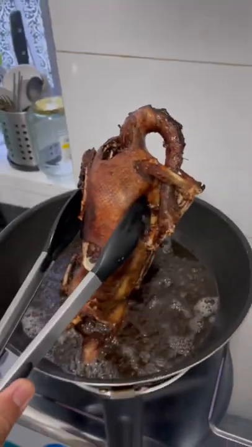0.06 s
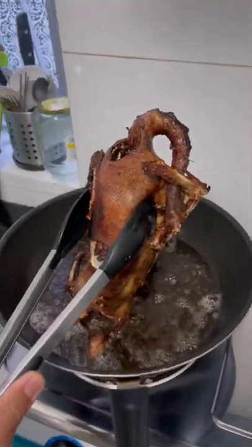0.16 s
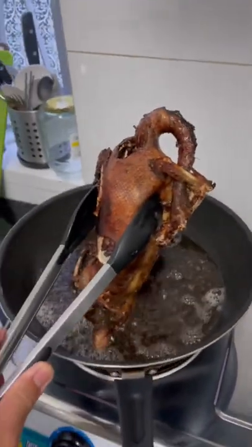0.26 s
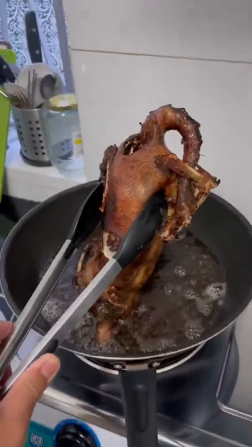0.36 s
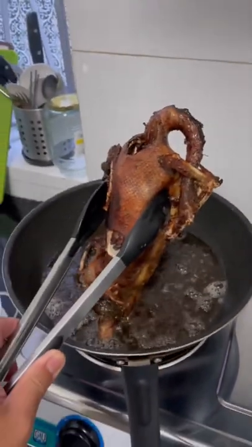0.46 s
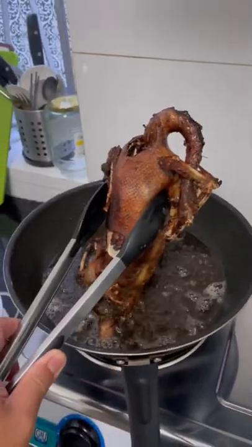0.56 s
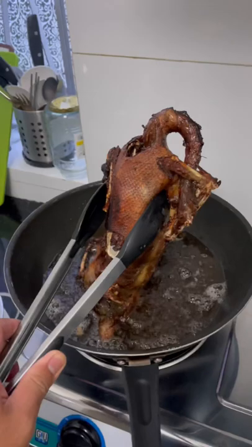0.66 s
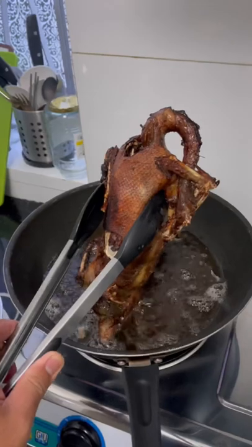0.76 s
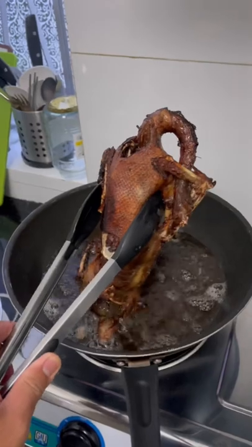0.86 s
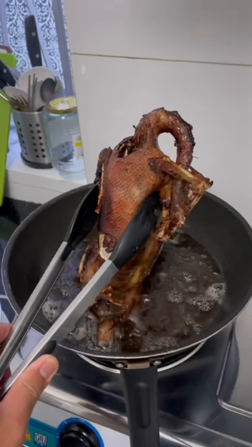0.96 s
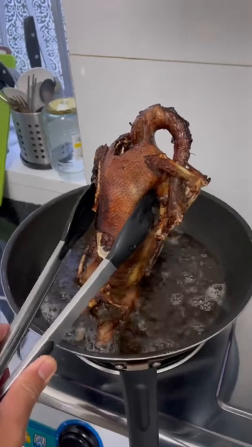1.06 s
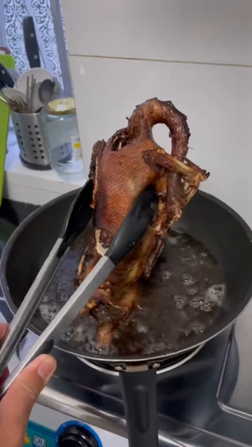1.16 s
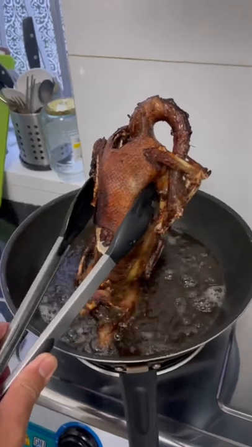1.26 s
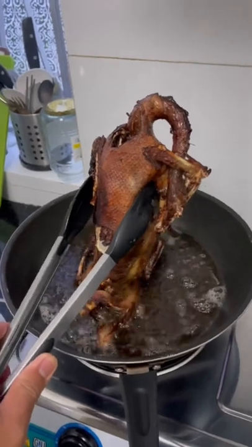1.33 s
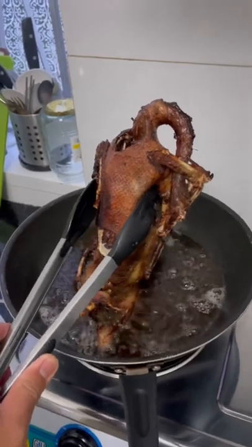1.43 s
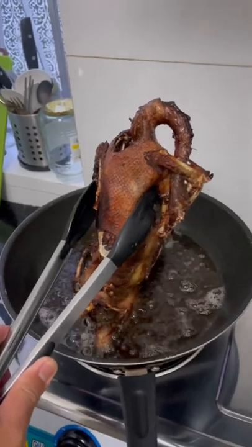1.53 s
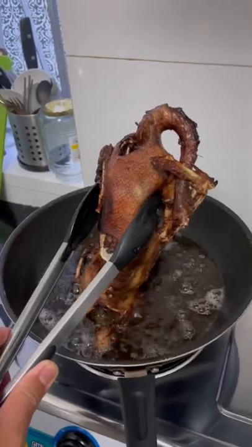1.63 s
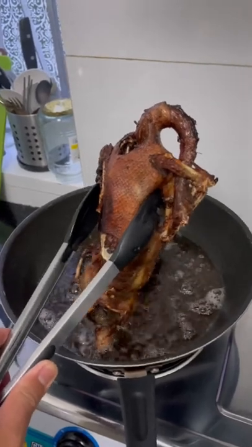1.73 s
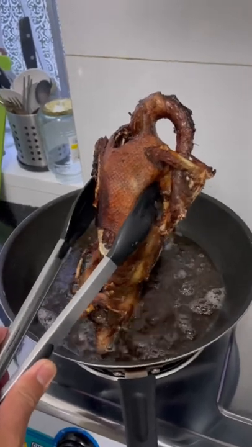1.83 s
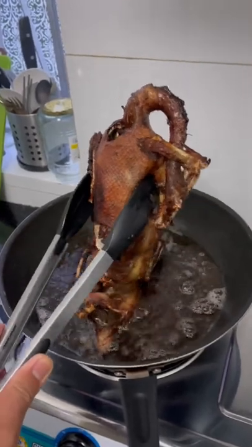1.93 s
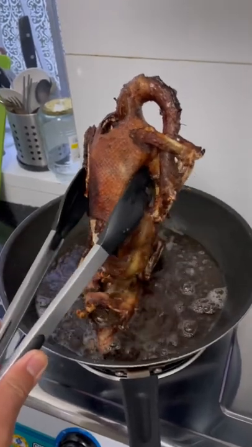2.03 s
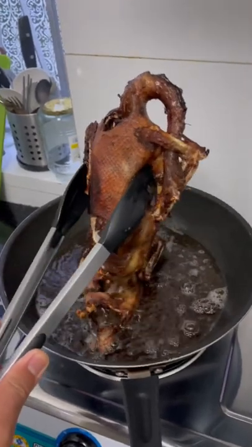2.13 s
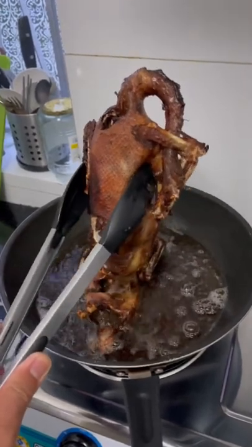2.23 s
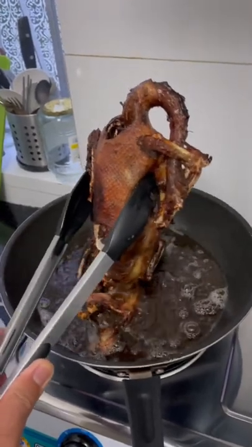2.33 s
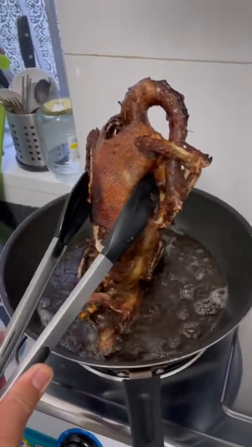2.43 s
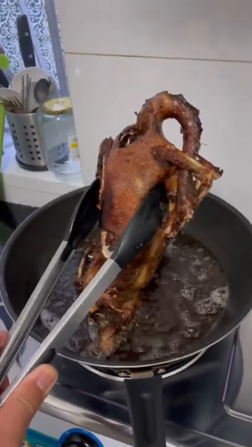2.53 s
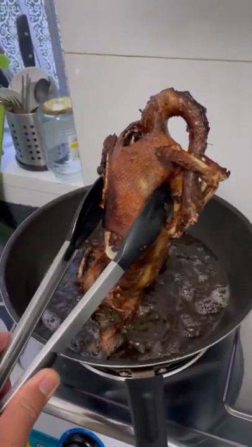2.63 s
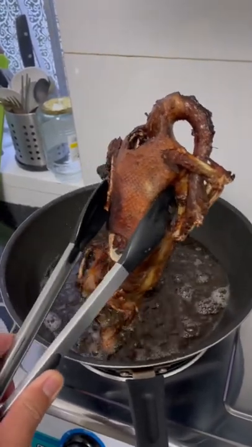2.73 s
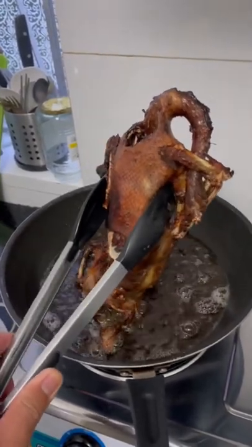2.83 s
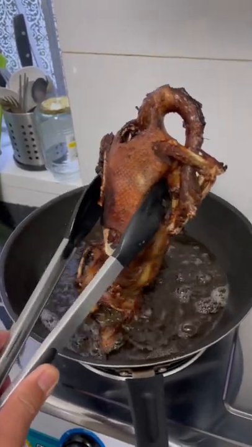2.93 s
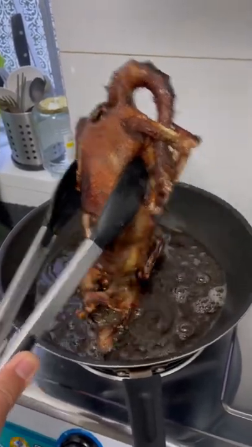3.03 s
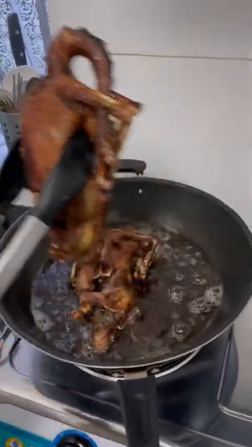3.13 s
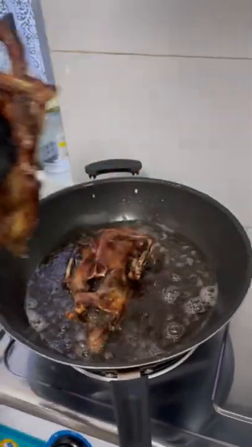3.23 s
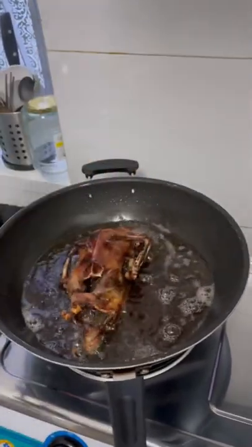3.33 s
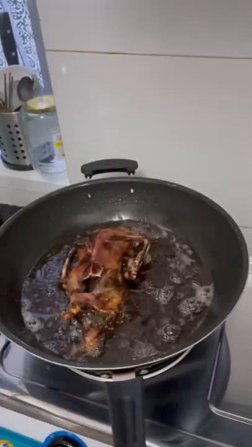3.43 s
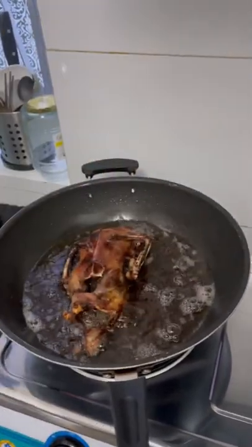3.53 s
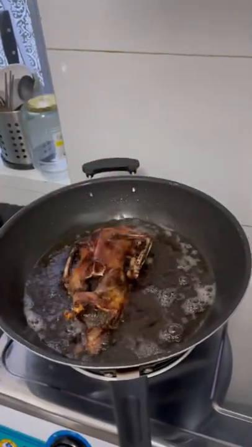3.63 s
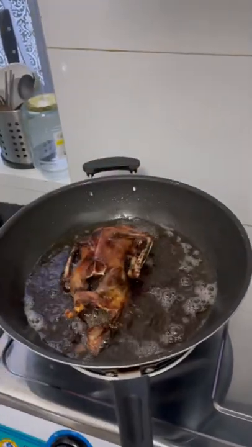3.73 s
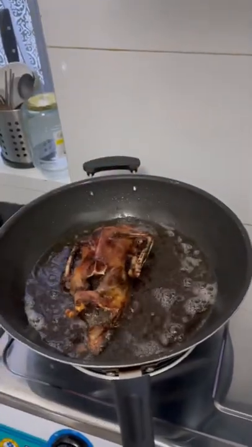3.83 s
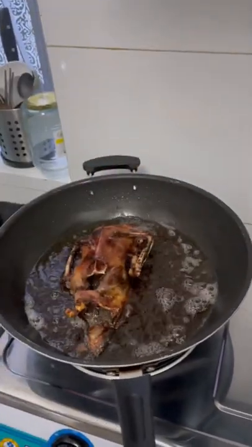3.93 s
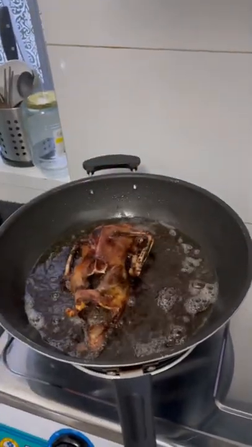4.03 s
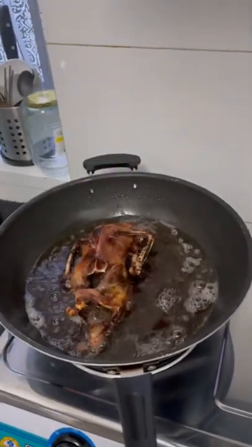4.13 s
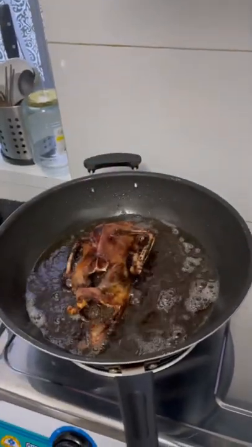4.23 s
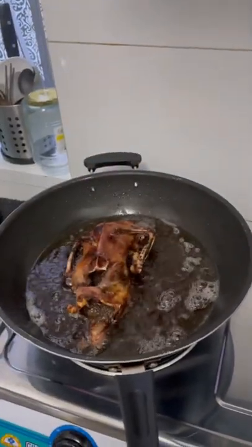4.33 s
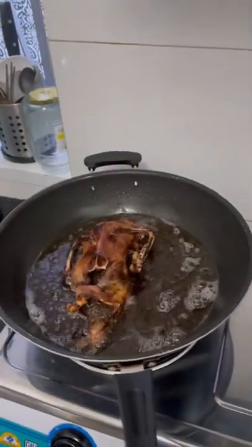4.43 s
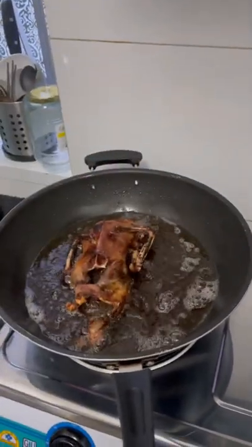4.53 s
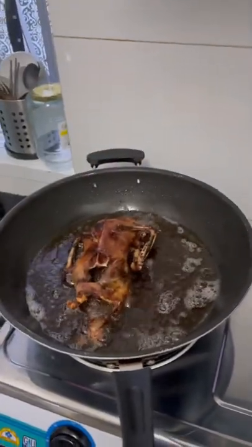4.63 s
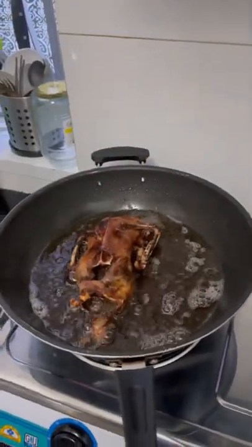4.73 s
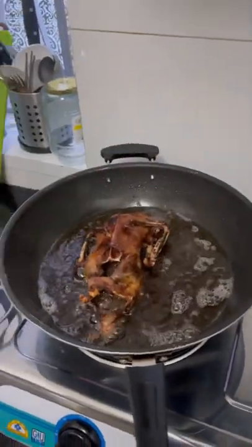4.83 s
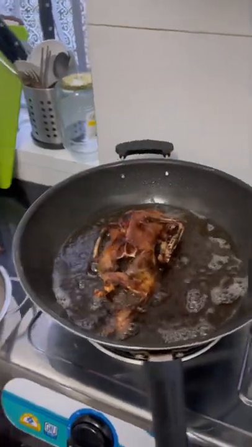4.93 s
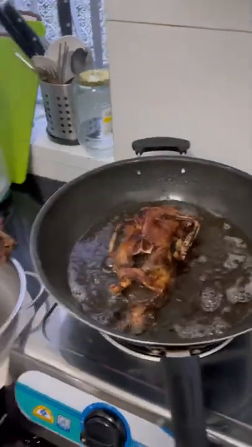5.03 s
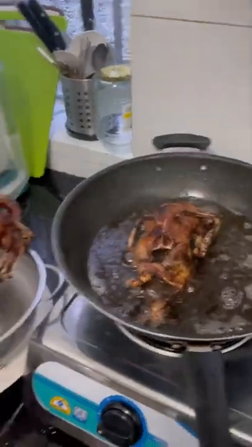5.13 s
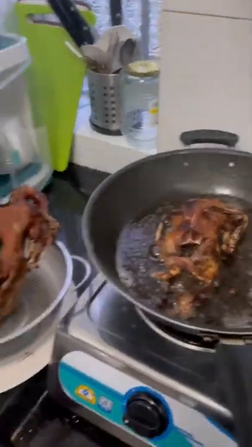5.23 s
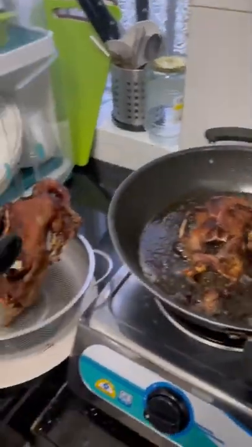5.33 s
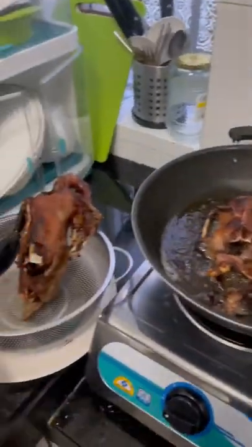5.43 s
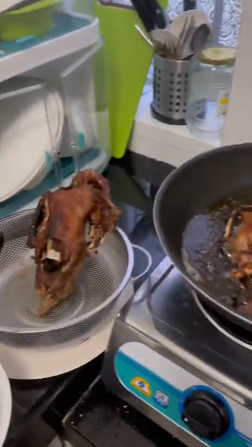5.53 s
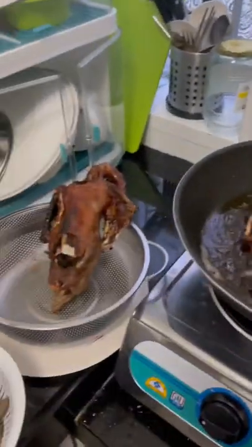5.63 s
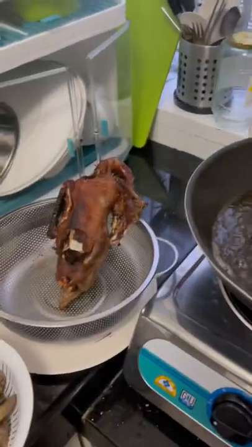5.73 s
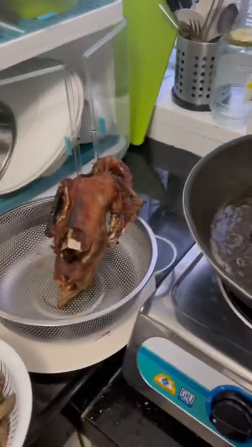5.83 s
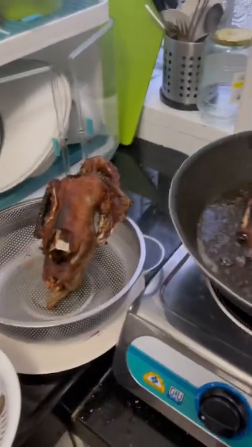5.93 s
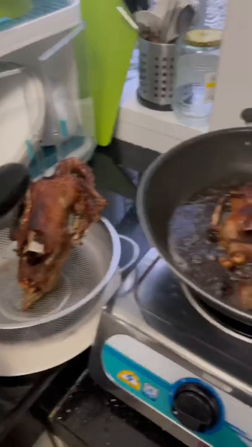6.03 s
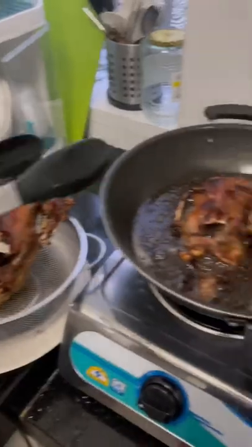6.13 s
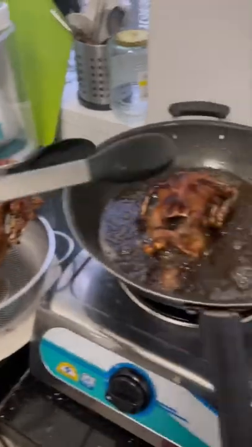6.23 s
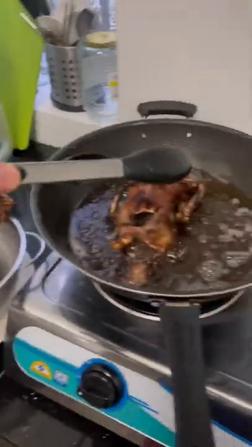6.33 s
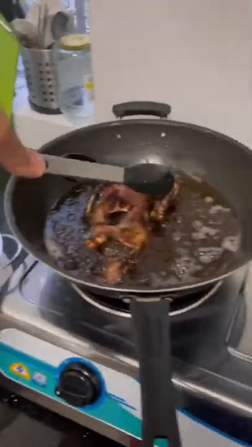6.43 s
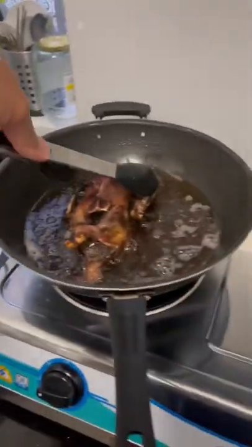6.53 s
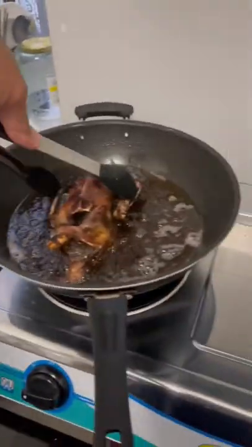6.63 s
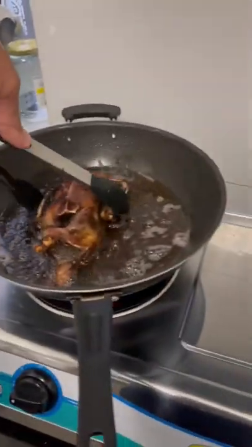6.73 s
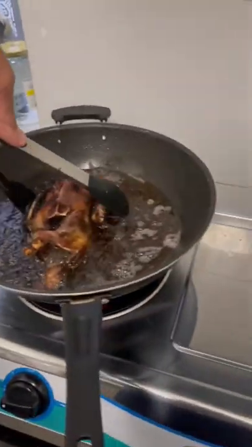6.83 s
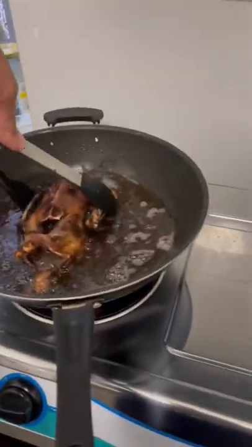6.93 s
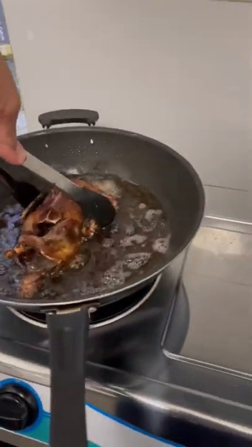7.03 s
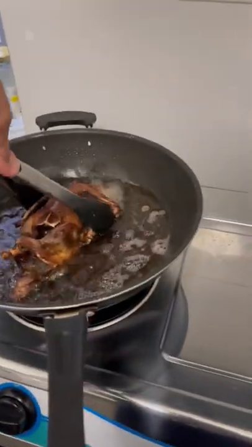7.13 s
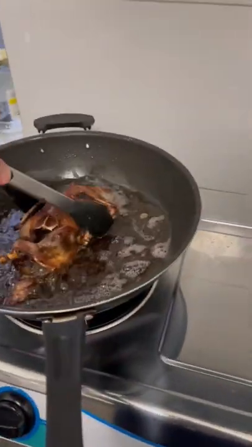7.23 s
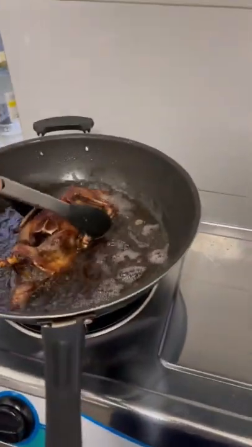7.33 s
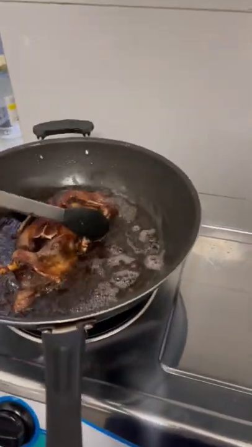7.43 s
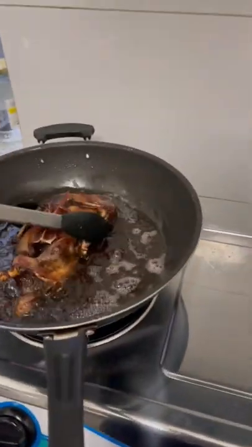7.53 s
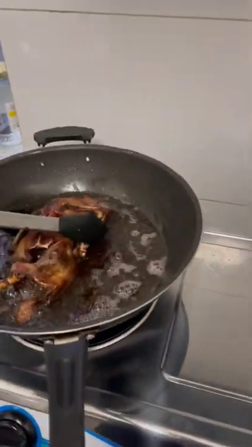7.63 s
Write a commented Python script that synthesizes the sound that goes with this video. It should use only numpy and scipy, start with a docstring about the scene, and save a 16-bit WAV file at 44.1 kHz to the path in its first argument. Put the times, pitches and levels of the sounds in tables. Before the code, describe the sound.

A close, hand-held stereo perspective on frying in a small tiled kitchen with a short, bright reverb. Throughout, an extractor fan gives a low rushing rumble with a slightly wavering hum near 200 Hz. Over it, hot oil sizzles with fine high fizz and coarser crackle. From 0 to 2 seconds pops are dense and sharp, with strong snaps around 0.6, 0.9 and 1.3 and a small dull thump at 0.56. They thin slightly until a heavy pan thump and loud pop at 3.1. From 3.3 to 7 the fizz weakens and pops are more isolated, notably at 5.1, 5.5, 5.7 and, with a soft thump, 6.65. Louder pops briefly duck the background. At 7.16 tongs rub crisp skin with a scratchy metallic ring; steam puffs at 7.27, clustered crackles follow, and a brighter steam jet swells from 7.6 to the end.

```python
"""Duck frying in a wok of hot oil in a small tiled kitchen, close to a hand-held phone.
The oil fizzes, crackles and pops: noise bursts and short gliding tones stand for bursting steam bubbles.
Behind it an extractor fan rumbles: rushing noise rings low resonances beside one drifting motor tone.
Dull thumps come from the pan; at last steam hisses under the tongs, which rub the skin and ring.
Two microphone ports hear it with a phase shift, and gain control ducks everything after loud pops."""
import sys
import numpy as np
from scipy import signal
from scipy.fft import rfft, irfft, next_fast_len
from scipy.io import wavfile
from scipy.ndimage import uniform_filter1d

SR = 44100
rng = np.random.default_rng(int(sys.argv[2]) if len(sys.argv) > 2 else 0)


def put_to_file(sound):
    """Save the sound as 16-bit audio at rate SR, in the file named by the first command-line argument."""
    columns = np.atleast_2d(sound).T  # one column per channel
    safe = np.clip(columns, -1, 1)
    whole_steps = np.round(safe * 32767)
    wavfile.write(sys.argv[1], SR, whole_steps.astype(np.int16))


N = 338232  # length in samples

# Background, air rush of the fan: [f/Hz, density level/dB]
FAN_RUSH = [(20, -38), (40, -3.5), (60, -0.5), (140, -0.5), (240, -1.5), (330, 1), (390, -7.5), (600, -11),
            (1000, -11.5), (1400, -17), (1850, -26.5), (2400, -23), (4000, -30), (8000, -63)]
# Background, room and duct resonances that the rush excites: [f/Hz, width/Hz, level/dB]
FAN_RESONANCES = [(54.9, 8.3, -48.5), (73.5, 6.7, -40.5), (92.3, 3.3, -36), (124.1, 8.3, -37.5),
                  (198.8, 9.2, -34), (216.6, 9.7, -37.5), (262.8, 20, -39), (288.6, 7.4, -34.5),
                  (341.2, 16, -41.5), (421, 6.7, -44), (467.8, 10.3, -45), (561, 23, -46), (641, 28, -44.5),
                  (926, 146, -45), (1846, 280, -45)]
# Top treble fade of the steady fan and oil sound: [f/Hz, level/dB]
STEADY_TOP = [(13200, 0), (14200, -14)]
# Room, decay of the tiled kitchen: [f/Hz, t60/s]
KITCHEN_DECAY = [(500, 0.21), (2000, 0.23), (5000, 0.18), (13000, 0.085)]
# Tongs rubbing over the crisp skin: [t/s, level/dB]
RUB_LEVEL = [(7.155, -70), (7.165, -39), (7.29, -41), (7.37, -46), (7.47, -36), (7.56, -45), (7.6, -36),
             (7.67, -49)]
# Resonances of the tongs: [f/Hz, width/Hz, level/dB]
TONG_RESONANCES = [(2870, 220, 2), (4200, 420, -1), (5650, 700, -9)]
# Steam squeezed out as the tongs press the meat: [t/s, level/dB]
STEAM_LEVEL = [(7.2, -66), (7.27, -37), (7.45, -51), (7.56, -46), (7.6, -29), (7.67, -28)]
# Colour of the steam jet: [f/Hz, level/dB]
STEAM_COLOUR = [(5000, -8), (8000, -9), (11000, -1), (13500, 8), (15000, -11)]
# Dull thumps of the pan: [t/s, level/dB, t60/s]
THUMPS = [(0.559, -22, 0.068), (3.0875, -17.5, 0.17), (6.645, -25.5, 0.17)]
# Colour of the thumps: [f/Hz, level/dB]
THUMP_COLOUR = [(250, -52), (420, 13.5), (700, 11.5), (1100, 14.5), (1500, 0), (2300, 9), (3500, -82)]
# Boiling of the oil: [t/s, fine fizz level/dB, coarse crackle level/dB]
BOIL = [(0.0, -26, -42), (0.34, -31, -44.5), (0.811, -30.5, -38.5), (1.202, -28.5, -52), (1.88, -32, -40.5),
        (2.39, -34.5, -48.5), (3.302, -31, -45), (3.802, -36.5, -45), (4.46, -34.5, -49.5),
        (5.248, -35.5, -45), (6.07, -38, -49), (7.152, -38.5, -47.5), (7.18, -44, -44), (7.33, -32.5, -44),
        (7.67, -33.5, -44)]
# Colour of the fine fizz: [f/Hz, level/dB]
FIZZ_COLOUR = [(1500, -27), (3000, 1.5), (5000, -2), (8000, 5.5), (9500, 2.5), (11200, 10.5), (12000, 3.5),
               (12800, 7), (13600, 11.5)]
# Colour of the coarse crackle: [f/Hz, level/dB]
CRACKLE_COLOUR = [(700, -12.5), (1500, 4.5), (2800, 14.5), (4200, 1.5), (5500, 14), (8000, -55)]
# Bubbles that ring with a pitch: [t/s, peak level/dB, f/Hz]
RINGING_BUBBLES = [(0.561, -12, 930), (0.571, -21, 830), (0.688, -23.5, 1630), (0.745, -22.5, 1150),
                   (0.797, -16, 4050), (0.84, -17.5, 4230), (0.976, -17, 2080), (0.977, -18.5, 4120),
                   (0.989, -25, 1430), (1.054, -20.5, 6000), (1.65, -23.5, 1250), (1.728, -29, 2100),
                   (2.118, -24.5, 2010), (3.067, -21, 5940), (3.087, -11, 1160), (3.090, -19, 373),
                   (3.127, -16.5, 830), (3.178, -30, 5900), (3.201, -24, 4870), (3.885, -24.5, 2920),
                   (4.217, -29, 1600), (4.441, -27.5, 1820), (4.464, -26, 5940), (4.686, -22.5, 1700),
                   (4.868, -29, 1840), (4.938, -26, 2100), (5.02, -25.5, 1700), (5.23, -28, 1700),
                   (5.655, -26, 2090), (7.4015, -25, 3970)]
# Bursting steam pockets, close up:
# [t/s, body level/dB, pocket radius/mm, bright snap level/dB, splutter level relative to the crack/dB]
POPS = [(0.035, -13, 0.43, -9.5, -28), (0.061, -11, 0.39, -14.5, -3.5), (0.2173, -8.5, 0.34, -34, -28),
        (0.283, -38, .5, -11, -23), (.3099, -42, .5, -9, -15), (0.356, -10, 0.6, -14.5, -6),
        (0.489, -22, 0.58, -14.5, -6), (0.5867, -20, 0.87, -9, -7), (0.5898, -2, 0.44, -3, -14),
        (.731, -18.5, 0.48, -34, -5), (0.752, -16.5, 0.83, -34, -4), (0.7962, -14, 0.79, -27, -4),
        (0.8115, -9.5, 0.42, -32, -19), (0.817, -14, 0.53, -32, -22), (0.8398, -10.5, 0.84, -32, -9),
        (0.8634, -11.5, 0.78, 3, -32), (1.029, -11, 0.41, -29, -20), (1.048, -9, 0.36, -7, -20),
        (1.094, -18, .57, -26, -12), (1.125, -14.5, 0.47, -23, -9), (1.188, -33, .6, -16, -22),
        (1.2226, -6, 0.36, -7.5, -21), (1.282, -24, 1.04, -13.5, -19), (1.3378, -3.5, 0.47, -4, -17),
        (1.4464, -15, 0.63, -7, -21), (1.463, -17.5, 0.84, -11, -17), (1.5875, -5.5, 0.28, -6, -26),
        (1.627, -21.5, 0.92, -37, -4), (1.639, -29, .52, -7, -25), (1.702, -34, .5, -20, -21),
        (1.73, -18.5, 1.2, -18, -14), (1.768, -23, 0.91, -15, -32), (1.787, -15, 0.41, -12, -19),
        (1.805, -10.5, 0.4, -13, -19), (1.8607, -9.5, 0.98, -40, -16), (1.882, -9.5, 0.59, -15, -7.5),
        (1.9044, -24, 0.53, -10, -24), (1.997, -7.5, 0.47, -8, -15.5), (2.0338, -32, .6, -6.5, -32),
        (2.1237, -26, 0.7, -10, -26), (2.1347, -23, 0.67, -9, -18), (2.2717, -9.5, 0.43, -35, -28),
        (2.2874, -29, 0.4, -20, -25), (2.309, -14, 0.64, -14, -13), (2.3692, -25, 0.57, -16, -31),
        (2.5145, -21, 0.44, -40, -5), (2.555, -14.5, 0.81, -19, -5), (2.6028, -15, 0.61, -7.5, -14.5),
        (2.729, -15.5, 0.49, -19, -12), (2.842, -22, 1.2, -36, -7), (2.862, -30, 0.89, -5, -38),
        (2.9128, -5.5, 0.55, -21, -38), (2.954, -25, 0.49, -8, -13), (3.0116, -32, .52, -11, -31),
        (3.0882, -4, 0.83, -5.5, -12), (3.13, -19, 0.72, -12, -7), (3.251, -10, 0.46, -12, -22),
        (3.382, -10, 0.78, -11.5, -10), (3.397, -16.5, 0.45, -9, -10), (3.521, -22, 0.58, -10.5, -12),
        (3.5581, -8.5, 0.6, -69, -32), (3.7497, -21, 0.72, -7, -15), (3.9927, -19, 0.48, -34, -7),
        (4.0107, -17, 0.8, -34, -18), (4.0388, -22, 0.54, -5.5, -30), (4.3112, -29, 0.55, -23, -22),
        (4.4423, -14.5, 0.61, -13.5, -15), (4.539, -24, 0.9, -16, -12), (4.6857, -14.5, 0.62, -17, -5.5),
        (4.935, -27, 1.1, -19, 0), (5.111, -7, 0.47, -3.5, -24), (5.188, -13.5, 0.45, -20, -9),
        (5.2912, -18, 0.45, -15, -15), (5.312, -11, 0.6, -6.5, -17), (5.461, -28, 0.23, -20, -25),
        (5.5221, -3, 0.46, -10.5, -7), (5.6035, -17.5, 0.5, -16, -15), (5.7243, -4, 0.68, -6, -26),
        (5.752, -22, 0.4, -16, -22.5), (6.008, -18.5, 0.68, -26, -16), (6.364, -9, 0.35, -9.5, -14.5),
        (6.645, -4, 0.77, -4, -16), (6.646, -14.5, 2, -25, -21), (7.076, -20.5, 0.69, -17.5, -17),
        (7.164, -12, 0.87, -42, -36), (7.1974, -21, 0.85, -46, -17), (7.219, -28, 0.92, -43, -18),
        (7.2327, -20, 0.8, -42, -24), (7.2862, -23, 1.1, -34, -26), (7.3116, -11.5, 0.62, -12, -23),
        (7.3287, -17, 0.59, -25, -27), (7.378, -27, 0.33, -14, -22), (7.4014, -12, 0.9, -36, -20),
        (7.418, -16.5, 1.17, -42, -25), (7.431, -18.5, 0.61, -23, -7), (7.477, -11.5, 0.8, -20, -11),
        (7.489, -12, 0.81, -20, -22), (7.528, -22, 0.76, -44, -17), (7.6076, -18.5, 1.03, -29, -17),
        (7.6626, -17.5, 1, -16, -22)]
# Overlapping bands of a pop, the first and last being silent ends: [f/Hz]
POP_BANDS = [600, 950, 1400, 2000, 2800, 3600, 4600, 5900, 7500, 10100, 15000]
# Microphone, treble loss: [f/Hz, level/dB]
MICROPHONE_COLOUR = [(11500, 0), (12500, -5), (14000, -23), (16000, -25)]
# Microphone, likeness of the two ports: [f/Hz, likeness 0-1]
PORT_LIKENESS = [(350, 1), (500, 0.87), (780, 0.018), (1200, 0.41), (1850, 0.99), (2550, 0.034),
                 (3400, 0.019), (4500, 0.11), (4900, 0.37), (5900, 0.96), (6600, 0.7), (7900, 0.58),
                 (9000, 1), (10500, 1), (11800, 0.71), (13000, 0.95)]
# Microphone, phase by which the left port leads: [f/Hz, phase/rad]
PORT_LEAD = [(0, 0), (600, .3), (950, -.9), (2070, .3), (3960, .9), (4650, 2.4), (4900, 3.3), (5500, 6.1),
             (6200, 6.4), (8350, 9.2), (9100, 9.43), (11700, 12.1), (11900, 12.57), (16000, 12.57)]
# Microphone, left port over right: [f/Hz, level/dB]
PORT_BALANCE = [(250, 0), (700, 1.8), (1300, .8), (2000, 0), (4400, 1.5), (5000, -.5), (6000, 0)]

RUSH_DB = -31.5
MOTOR_HZ, MOTOR_DB, MOTOR_DRIFT_HZ = 199.5, -35, 2.533
RAGGED_DB = 4  # unevenness of splutters and thumps
# Length at 1 kHz, power by which it falls with pitch, share of pitch gained per length
BLIP_S, BLIP_SHORTER, BLIP_GLIDE = 0.0051, 0.24, -0.13
# Faint bubbles: loudest over the crackle, range below that, pitch range
FAINT_DB, FAINT_SPREAD_DB, FAINT_HZ = 15, 1, (1700, 7400)
# Small spits: body, snap and splutter levels, each with its random spread; range of radii
SPIT_DB, SPIT_SPREAD_DB, SPIT_MM = (-30, -28.5, -22), (-1.5, 4, 14), (0.31, 2.1)
POCKET_HZ_MM = 3260  # the body of a pop centres on this pitch for a radius of 1 mm
BELOW_DB_PER_OCTAVE, ABOVE_DB_PER_OCTAVE = 24, 25  # fall of the body around its pitch
WIDENING = 0.72  # share of that fall lost when the body level is 0 dB
EDGE_HZ = 16300  # upper band limit


def gain_of(db):
    """Amplitude factor of a level in dB."""
    return 10 ** (np.asarray(db) / 20)


def evened(x):
    """Scales a signal to an rms of 1."""
    return x / np.sqrt(np.mean(x ** 2) + 1e-20)


def read(points, hz):
    """Reads a curve between its points on a log frequency axis."""
    f, value = np.transpose(points)
    return np.interp(np.log(hz + 1), np.log(f + 1), value)


def level_over_time(points):
    """Gain at every sample from rows of t/s, level/dB."""
    s, db = np.transpose(points)
    return gain_of(np.interp(np.arange(N) / SR, s, db))


def slow_drift(window):
    """Smooth random wander with an rms of 1, from noise averaged twice."""
    once = uniform_filter1d(rng.standard_normal(N), window)
    return evened(uniform_filter1d(once, window))


def coloured(x, spectrum):
    """Causal filter of the given dB shape: the phase follows from the log gain."""
    log_gain = np.log(gain_of(read(spectrum, abs(np.fft.fftfreq(8192, 1 / SR)))))
    response = np.exp(np.conj(signal.hilbert(log_gain)))
    taps = np.fft.ifft(response).real[:4096]
    return signal.oaconvolve(x, taps[None], axes=1)[:, :N]


def ragged(noise):
    """Breaks even noise into lumps a few milliseconds long."""
    lumps = evened(uniform_filter1d(rng.standard_normal(noise.shape), 90))
    return evened(noise * gain_of(RAGGED_DB * lumps))


def kitchen(x, wet_db, count=3):
    """Direct sound plus two draws of sparse echoes dying band by band; x wanders over three spots of the pan."""
    taps = np.zeros((count, 2, SR // 2))
    at = np.arange(120, SR // 2 - 20, 20)
    at = at + rng.integers(0, 20, (count, 2, len(at)))
    np.put_along_axis(taps, at, rng.choice([-1., 1.], at.shape), 2)
    hz, t, bands = signal.stft(taps, SR, nperseg=256)
    decay = gain_of(-60 * t / read(KITCHEN_DECAY, hz)[:, None])
    tail = signal.istft(bands * decay, SR, nperseg=256)[1]
    tail *= gain_of(wet_db) / np.linalg.norm(tail[0, 0])
    turns = np.arange(N) * 2.3 / SR + np.arange(count)[:, None] / count  # 2.3 rounds a second
    spot = np.cos(2 * np.pi * turns) * np.sqrt(2 / count)
    wet = signal.oaconvolve((x * spot)[:, None], tail, axes=2)[:, :, :N].sum(0)
    return wet + [x, 0.24 * np.roll(x, 30)]


def fan():
    """Two unrelated draws of rushing air, with narrow resonances that ring on it and waver in strength."""
    air = rng.standard_normal((2, N))
    out = gain_of(RUSH_DB) * evened(coloured(air, FAN_RUSH))
    for hz, width, db in FAN_RESONANCES:
        radius = np.exp(-np.pi * width / SR)
        poles = [1, -2 * radius * np.cos(2 * np.pi * hz / SR), radius * radius]
        waver_db = 1.06 * slow_drift(9000)
        ring = signal.lfilter([1, -1], poles, np.roll(air, rng.integers(N), 1))
        out += gain_of(db + waver_db) * evened(ring)
    return out


def motor():
    """The fan motor's steady tone: one sine whose pitch drifts a little."""
    hz = MOTOR_HZ + MOTOR_DRIFT_HZ * slow_drift(3000)
    return gain_of(MOTOR_DB) * np.sqrt(2) * np.sin(2 * np.pi * np.cumsum(hz) / SR)


def tongs():
    """Dense uneven slips over the skin that ring the arms of the tongs."""
    happens = rng.random(N) < 900 / SR  # 900 slips a second on average
    strength = gain_of(4.0 * rng.exponential(1, N).clip(0, 4))
    slips = strength * rng.standard_normal(N) * happens
    rings = np.zeros(N)
    for hz, width, db in TONG_RESONANCES:
        rings += gain_of(db) * evened(signal.lfilter(*signal.iirpeak(hz, hz / width, SR), slips))
    return kitchen(level_over_time(RUB_LEVEL) * evened(rings), wet_db=-6.0)


def steam():
    """Escaping steam as a smooth, bright jet of noise."""
    hiss = evened(coloured(rng.standard_normal((2, N)), STEAM_COLOUR))
    return level_over_time(STEAM_LEVEL) * hiss


def thumps():
    """Dull, ragged bursts of low noise that die away in the pan."""
    t = np.arange(N) / SR
    fade = sum(gain_of(db - 60 * (t - s).clip(0) / t60) * (t > s) for s, db, t60 in THUMPS)
    noise = ragged(rng.standard_normal((2, N)))
    return coloured(fade * noise, THUMP_COLOUR) / np.std(coloured(noise, THUMP_COLOUR))


def blip(hz, length_s, glide):
    """A bubble swells, rings a few cycles on a gliding pitch and dies; its envelope peaks at 1."""
    u = np.arange(round(3 * length_s * SR) + 2) / SR / length_s  # time in lengths
    swell = np.e * 3 * u * np.exp(-3 * u)
    return swell * np.sin(2 * np.pi * hz * length_s * (u + glide * u * u / 2))


def bubbles(lo_hz, hi_hz, per_s, spread_db, hiss_db, count=24):
    """Tiny bursts of many pitches, a few of them large, over the even hiss of those too small to tell apart."""
    size = gain_of(spread_db * np.minimum(rng.exponential(1, N), 4))
    size = size * (rng.random(N) < per_s / SR)
    kind = rng.integers(0, count, N)
    cycles = rng.uniform(1.2, 3.2, count)
    bursts = np.zeros(N)
    for k, hz in enumerate(np.geomspace(lo_hz, hi_hz, count)):
        length_s = cycles[k] / hz
        rung = signal.oaconvolve(size * (kind == k), blip(hz, length_s, -0.03))[:N]
        bursts += rung / np.sqrt(length_s)  # longer blips carry no more energy
    hiss = gain_of(hiss_db) * rng.standard_normal((2, N))
    return evened(evened(kitchen(bursts, wet_db=2.5)) + hiss)


def oil():
    """Fine fizz and coarser crackle of many small bubbles, each following the boil."""
    s, fizz_db, crackle_db = np.transpose(BOIL)
    fizz = bubbles(4350.0, 13450.0, per_s=900., spread_db=7.5, hiss_db=-0.5)
    fizz = evened(coloured(fizz, FIZZ_COLOUR))
    crackle = bubbles(1210.0, 6940.0, per_s=550., spread_db=8.0, hiss_db=-21.0)
    crackle = evened(coloured(crackle, CRACKLE_COLOUR))
    fizz_level = level_over_time(list(zip(s, fizz_db)))
    return fizz_level * fizz + level_over_time(list(zip(s, crackle_db))) * crackle


def blips(count=90):
    """Single ringing bubbles and many faint random ones; higher ones are shorter."""
    s, size, pitch = rng.random((count, 3)).T
    times, _, crackle_db = np.transpose(BOIL)
    s = s * N / SR
    faint_db = np.interp(s, times, crackle_db) + FAINT_DB - FAINT_SPREAD_DB * size
    faint_hz = FAINT_HZ[0] * (FAINT_HZ[1] / FAINT_HZ[0]) ** pitch
    direct = np.zeros(N + SR)
    for start, db, hz in [*RINGING_BUBBLES, *zip(s, faint_db, faint_hz)]:
        sound = gain_of(db) * blip(hz, BLIP_S * (1000 / hz) ** BLIP_SHORTER, BLIP_GLIDE)
        direct[round(start * SR):][:len(sound)] += sound
    return kitchen(direct[:N], wet_db=-6.5)


def spits(count=220):
    """Rows for random small pops, denser where the crackle is strong."""
    s, _, crackle_db = np.transpose(BOIL)
    t = np.linspace(0, s[-1] - .02, 400)
    passed = np.cumsum(gain_of(np.interp(t, s, crackle_db)))
    u = rng.random((count, 2))
    spread = rng.standard_normal((count, 3)).clip(-1.5, 1.5)
    body_db, snap_db, splutter_db = (SPIT_DB + spread * SPIT_SPREAD_DB).T
    radius_mm = SPIT_MM[0] * (SPIT_MM[1] / SPIT_MM[0]) ** u[:, 1]
    start = np.interp(u[:, 0] * passed[-1], passed, t) + .002
    return list(zip(start, body_db, radius_mm, snap_db, splutter_db))


def pops():
    """Each pop is a sharp crack among weaker ones and a dying splutter, coloured by the pocket's size."""
    t, rows = np.arange(4000) / SR, POPS + spits()
    noises = ragged(rng.standard_normal((len(rows), len(t))))
    scatter = rng.random((len(rows), 5))
    middles = np.array(POP_BANDS[1:-1])
    cracks, splutters = np.zeros((2, len(middles), N + len(t)))
    for (s, body_db, mm, snap_db, splutter_db), noise, u in zip(rows, noises, scatter):
        octaves = np.log2(middles * mm / POCKET_HZ_MM)
        fall_db = np.maximum(ABOVE_DB_PER_OCTAVE * octaves, -BELOW_DB_PER_OCTAVE * octaves)
        levels_db = body_db - (1 - WIDENING * gain_of(body_db)) * fall_db
        levels_db[-1] = snap_db  # the tearing film sets the top band
        at, colour = round(s * SR), gain_of(levels_db)[:, None]
        loudest = colour.max()
        t60 = 0.068 + 0.12 * loudest  # louder pops splutter longer
        cracks[:, at] += colour[:, 0]
        offsets = np.round((u - .1) * (.0015 + .004 * loudest) * SR).astype(int)
        cracks[:, at + offsets] += .33 * colour * noise[:5]
        envelope = gain_of(splutter_db - 60 * t / t60) * (1 - np.exp(-t / 0.00034))
        splutters[:, at:at + len(t)] += colour * envelope * noise
    size = next_fast_len(N + len(t))
    hz, spectrum = np.fft.rfftfreq(size, 1 / SR), 0
    for middle, crack, splutter in zip(middles, cracks, splutters):
        # a click shrinks with the share of the spectrum kept, noise with its root
        share = min(.85 * middle, 6500) / SR
        band = read([(f, f == middle) for f in POP_BANDS], hz)
        spectrum = spectrum + band * rfft(crack / share + 0.68 * splutter / np.sqrt(share), size)
    return kitchen(irfft(spectrum, size)[:N], wet_db=-9.5)


def scene():
    """Two unrelated draws of the sound field; the ports share the first."""
    steady = coloured(fan() + oil(), STEADY_TOP) + [motor(), np.zeros(N)]
    return steady + tongs() + steam() + thumps() + blips() + pops()


def record(dry):
    """Microphone colour, port pair, gain control, soft overload and band limit."""
    size = next_fast_len(N + 4096)
    hz = np.fft.rfftfreq(size, 1 / SR)
    shared, other = rfft(coloured(dry, MICROPHONE_COLOUR), size)
    same = np.clip(read(PORT_LIKENESS, hz), 0, 1)
    tilt = gain_of(read(PORT_BALANCE, hz) / 2)
    f, lead = np.transpose(PORT_LEAD)
    turn = np.exp(.5j * np.interp(hz, f, lead))  # half the lead on each port
    common = np.sqrt((1 + same) / 2) * shared
    apart = np.sqrt((1 - same) / 2) * other
    left, right = (common + apart) * tilt * turn, (common - apart) / tilt / turn
    ports = irfft(np.array([left, right]), size)[:, :N]
    power = uniform_filter1d((ports ** 2).mean(0), 900)
    power_db = 10 * np.log10(abs(power) + 1e-12)
    fall = np.arange(N) * 23.0 / SR  # held level recovers 23 dB a second
    held_db = np.maximum.accumulate(power_db + fall) - fall
    over_db = np.maximum(held_db + 18.5, 0)  # threshold -18.5 dB
    cut_db = 0.85 * signal.lfilter([.0007], [1, .0007 - 1], over_db)  # the gain follows sluggishly
    ducked = ports / gain_of(cut_db)
    ducked = .9 * np.tanh(ducked / .9)  # the sharpest peaks overload softly
    band_limit = signal.firwin(511, EDGE_HZ, window=("kaiser", 9), fs=SR)
    return signal.oaconvolve(ducked, band_limit[None], "same")


dry = scene()
out = record(dry)
put_to_file(out)
```